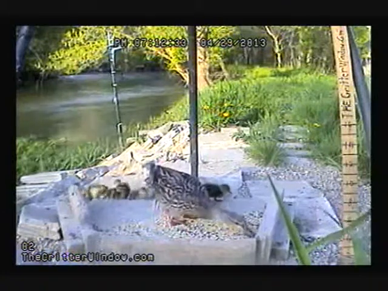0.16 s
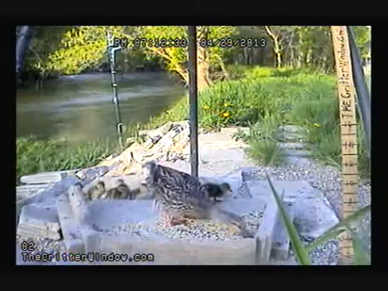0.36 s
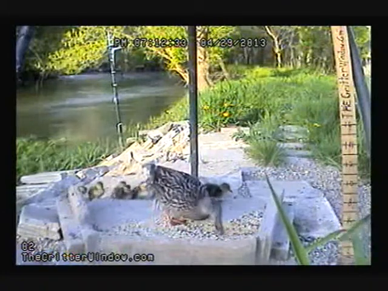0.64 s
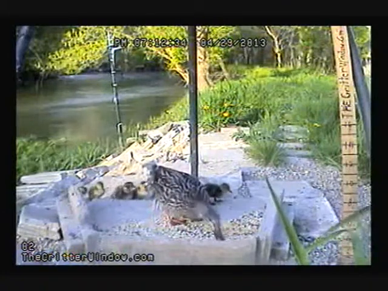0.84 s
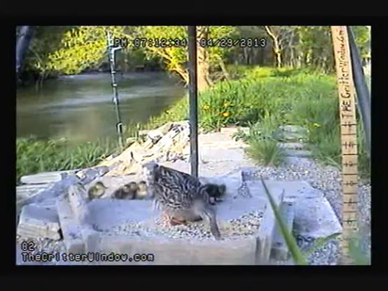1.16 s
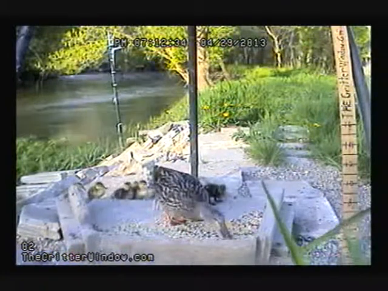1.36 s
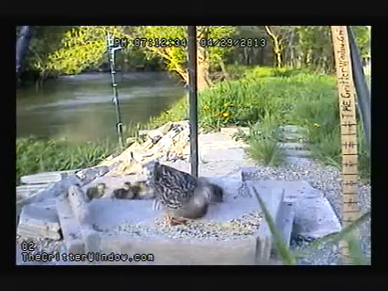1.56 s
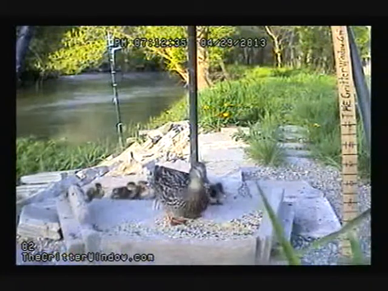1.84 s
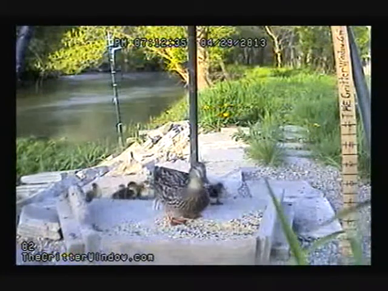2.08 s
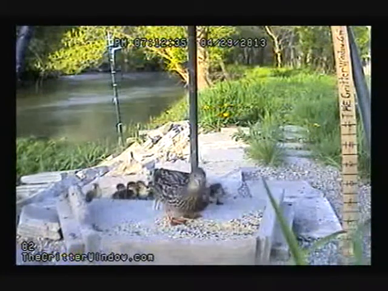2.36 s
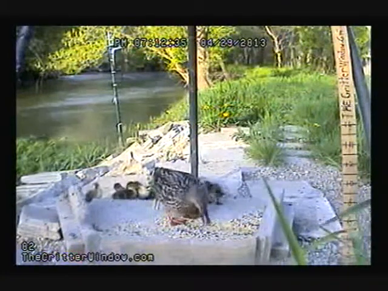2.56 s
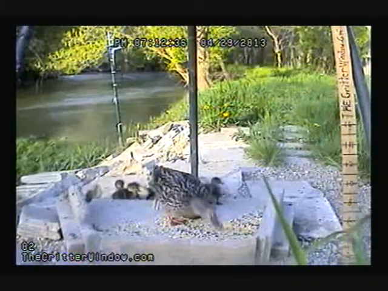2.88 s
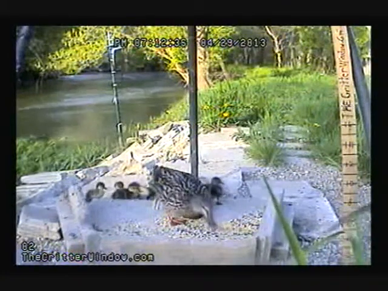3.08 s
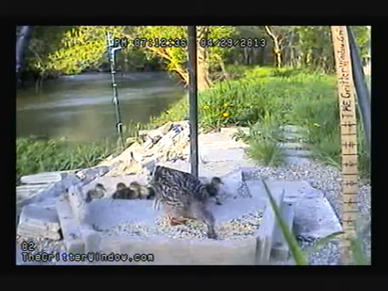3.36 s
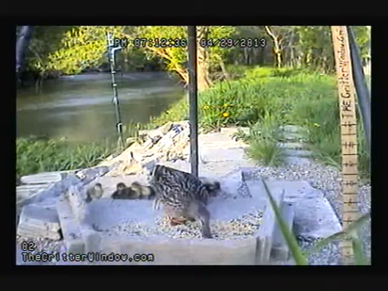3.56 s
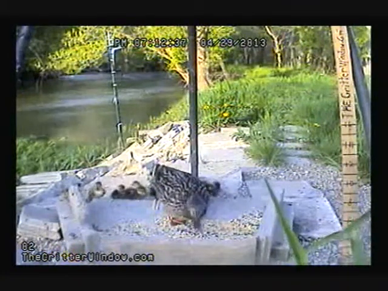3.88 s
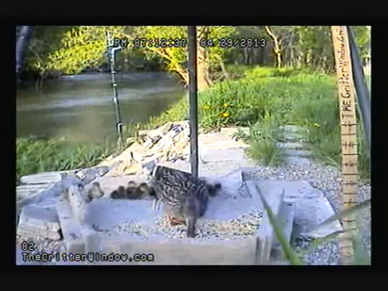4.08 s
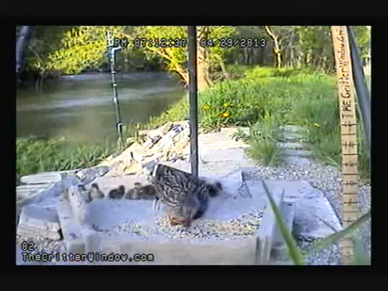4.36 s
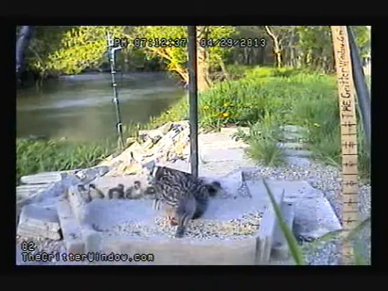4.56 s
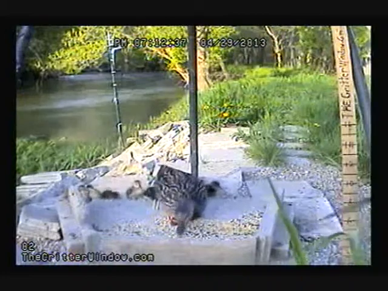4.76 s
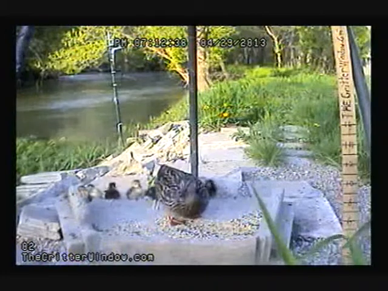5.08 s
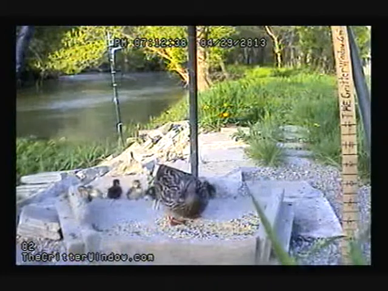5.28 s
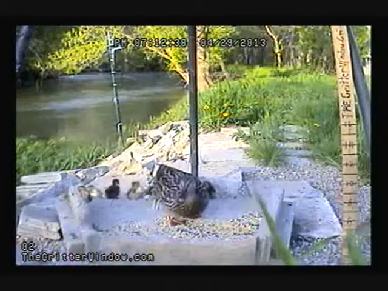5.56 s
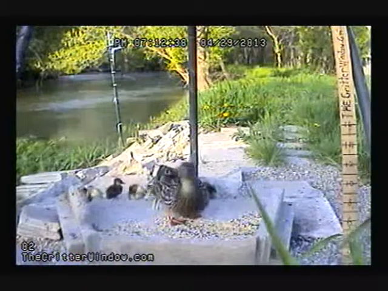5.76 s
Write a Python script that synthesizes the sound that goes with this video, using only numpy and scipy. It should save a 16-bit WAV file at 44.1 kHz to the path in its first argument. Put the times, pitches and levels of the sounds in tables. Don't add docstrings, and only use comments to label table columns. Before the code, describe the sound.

Close outdoor scene on a stony river bank. Ducklings give scattered thin, sliding peeps throughout, while the mother makes breathy two-toned rising whistles and short low clucks, busiest after four seconds. Bills tick, knock and scrape in loose seed. Faint songbirds chip across the water over a steady rush and low traffic hum. Near the end, wind softly thumps the still microphone.

```python
import sys
import numpy as np
from scipy import signal
from scipy.io import wavfile
from scipy.ndimage import uniform_filter1d

SR = 44100
rng = np.random.default_rng(int(sys.argv[2]) if len(sys.argv) > 2 else 0)


def level_to_linear(level):
    exponent = np.asarray(level, float) / 20
    return 10 ** exponent


def persist_wave(psi):
    counts = np.round(np.clip(psi, -1, 1) * 32767).astype(np.int16)
    wavfile.write(sys.argv[1], SR, np.atleast_2d(counts).T)


N = 261513


def track(table):
    s, *columns = np.transpose(table)
    return [np.interp(np.arange(N) / SR, s, c) for c in columns]


def unit(x):
    return x / np.sqrt(np.mean(x ** 2))


def band(x, lo_hz, hi_hz, order=2):
    sos = signal.butter(order, [lo_hz, min(hi_hz, .45 * SR)], "band", fs=SR, output="sos")
    return signal.sosfilt(sos, x)


def add(out, s, sound):
    i = max(int(s * SR), 0)
    out[i:i + len(sound)] += sound[:N - i]


def walk(rate_hz, size=N):
    hold = int(SR / rate_hz)
    steps = np.repeat(rng.standard_normal(size // hold + 1), hold)
    return 1.576 * uniform_filter1d(uniform_filter1d(steps, hold), hold)[:size]


def coloured(spectrum, flicker_db, rate_hz):
    hz, db = np.transpose(spectrum)
    octaves = np.log2(hz[-1] / hz[0])
    out = np.zeros(N)
    for f in hz[0] * 2 ** np.arange(1 / 6, octaves, 1 / 3):
        part = unit(band(rng.standard_normal(N), f / 2 ** (1 / 6), f * 2 ** (1 / 6)))
        level_db = np.interp(np.log(f), np.log(hz), db)
        out += part * np.sqrt(f) * level_to_linear(level_db + flicker_db * walk(rate_hz))
    return unit(out)


def echo(x, t60_s, gap_s):
    t = np.arange(int(.5 * SR)) / SR
    scatter = rng.standard_normal(len(t)) * level_to_linear(-60 * t / t60_s) * (t > gap_s)
    return signal.fftconvolve(x, scatter / np.sqrt(np.sum(scatter ** 2)))[:N]


def note(table, edge_s, smooth_s):
    s, *columns = np.transpose(table)
    t = np.arange(s[0] - edge_s, s[-1] + edge_s, 1 / SR)
    shape = np.clip(np.minimum(t - t[0], t[-1] - t) / (2 * edge_s), 0, 1) ** 2
    curves = [uniform_filter1d(np.interp(t, s, c), int(smooth_s * SR)) for c in columns]
    return t[0], shape, curves


def phase(hz, wobble):
    trembling_hz = hz * (1 + wobble * walk(89.0, size=len(hz)))
    return 2 * np.pi * (rng.random() + np.cumsum(trembling_hz) / SR)


def calls(rows, breath, arch=False, power=1):
    first_db, full, until, last_db = breath
    u = np.linspace(0, 1, num=12)
    way = 4 * u * (1 - u) if arch else u ** power
    corners = np.clip([0, full, max(until, full), 1], 0, 1)
    swell = np.interp(u, corners, (level_to_linear(first_db), 1, 1, level_to_linear(last_db)))
    db = 20 * np.log10(swell)
    return [np.transpose([s + u * length, a + (b - a) * way, level + db]) for s, length, a, b, level in rows]


def pipe(whistled):
    out = np.zeros(N)
    for call in whistled:
        curve = [(s, hz, level_to_linear(db)) for s, hz, db in call]
        s, shape, (hz, gain) = note(curve, edge_s=.003, smooth_s=0.0021)
        p = phase(hz, wobble=0.0073)
        tone = np.sin(p) + level_to_linear(-33.5) * np.sin(2 * p)
        breath = gain * level_to_linear(1.9 * walk(87, size=len(p)))
        add(out, s, np.sqrt(2) * shape * breath * tone)
    return out


def crackle(count=900):
    out = np.zeros(N)
    for when, pitch, size in rng.random((count, 3)):
        hz = 2500 * 3.8 ** pitch
        grain = signal.windows.hann(int(14 * SR / hz))
        ring = np.sin(2 * np.pi * hz * np.arange(len(grain)) / SR)
        add(out, when * N / SR, level_to_linear(-1.6 * np.log(1 - size)) * grain * ring)
    return unit(out)


# time in seconds, rustle level in dB.
BUSTLE = [(0.0, -62.5), (0.54, -63.5), (1.5, -59.5), (2.08, -55.5), (2.97, -62.5), (3.95, -60), (5.17, -59),
          (5.43, -51.5), (5.93, -53)]
# time in seconds, level in dB.
TRAFFIC = [(0.0, -45.5), (.55, -43.5), (1.1, -44.5), (1.7, -46), (2.3, -45.5), (2.85, -43.5), (3.3, -46),
           (3.9, -46.5), (5.0, -45.5), (5.93, -45.5)]
# frequency in Hz, level in dB per Hz.
RUSTLE_TONE = [(880, -38), (1500, -6), (2810, -1), (3880, -2.5), (5840, -11), (9510, -16), (12000, -10.5),
               (15600, -55), (22000, -120)]
# frequency in Hz, level in dB per Hz.
RUSH_TONE = [(120, -63), (200, -2.5), (251, -3), (565, -6.5), (930, 2.5), (1270, 1), (1760, -3),
             (3650, -11), (5350, -27), (6000, -68), (7800, -30), (13200, -120)]
# frequency in Hz, level in dB per Hz.
HUM_TONE = [(12, -56), (20, -13), (32, -9), (82, 4.5), (102, 3), (155, -11), (186, -8.5), (231, -27.5),
            (300, -28.5), (390, -19.5), (660, -120)]


def riverbank():
    bustle_db, = track(BUSTLE)
    traffic_db, = track(TRAFFIC)
    rush = coloured(RUSH_TONE, flicker_db=1.15, rate_hz=14) * level_to_linear(traffic_db)
    rustle = coloured(RUSTLE_TONE, flicker_db=1.6, rate_hz=20) * level_to_linear(bustle_db + 4.5)
    rustle = rustle * level_to_linear(.9 * walk(45))
    snaps = crackle() * level_to_linear(bustle_db - 7.0)
    hum = coloured(HUM_TONE, flicker_db=0.34, rate_hz=4.26) * level_to_linear(-44)
    return rush + rustle + snaps + hum


# start in seconds, length in seconds, first pitch in Hz, last pitch in Hz, level in dB.
SLIDES = [(0.0, .03, 3220, 2480, -48), (.295, .02, 3200, 3400, -50), (.32, .02, 4000, 3750, -46),
          (.362, .02, 3600, 3300, -49), (.555, 0.036, 3950, 2900, -40), (.59, .022, 2850, 2550, -49),
          (.615, 0.033, 3960, 3850, -58), (.945, 0.054, 4090, 2770, -37.5),
          (.995, 0.023, 2850, 2860, -38.5), (1.292, .025, 4030, 3600, -50), (1.595, .016, 2860, 3010, -48),
          (1.603, 0.022, 3850, 3500, -45), (2.19, .02, 3760, 3550, -41), (2.315, 0.037, 2750, 3100, -48),
          (2.478, 0.046, 3900, 2950, -38.5), (2.6, 0.039, 3090, 2600, -47),
          (2.64, 0.017, 2720, 2620, -42.5), (3.803, 0.023, 2630, 2760, -47),
          (4.295, 0.049, 2750, 3420, -49), (5.375, 0.028, 2520, 2100, -49), (5.585, 0.028, 3280, 2800, -42),
          (5.605, 0.03, 3820, 2950, -35)]
# start in seconds, length in seconds, first pitch in Hz, last pitch in Hz, level in dB.
DROOPS = [(.33, 0.053, 3570, 2480, -44), (.665, 0.073, 3550, 2680, -48.5), (1.61, .024, 3020, 2680, -44),
          (1.632, .025, 2600, 2050, -53), (2.525, .035, 3010, 2620, -50), (2.842, 0.052, 3040, 2150, -41),
          (3.75, 0.062, 3040, 2510, -40.5), (4.012, 0.043, 3200, 2510, -40.5),
          (4.348, 0.038, 3410, 2410, -45), (5.328, 0.045, 3290, 2520, -36.5),
          (5.625, 0.026, 3280, 2190, -39), (5.65, .07, 3330, 2580, -46)]
# start in seconds, length in seconds, foot pitch in Hz, top pitch in Hz, level in dB.
ARCHES = [(1.375, .03, 2710, 2860, -46), (4.565, 0.083, 2760, 3680, -44.5), (4.66, 0.04, 2410, 2700, -43.5),
          (5.14, 0.058, 2700, 2870, -46.5)]
# time in seconds, pitch in Hz, level in dB.
WARBLE = [(2.12, 3100, -66), (2.155, 3420, -49), (2.18, 3540, -37), (2.2, 3170, -35.5),
          (2.222, 3160, -42.5), (2.24, 2570, -62)]


def duckling_peeps():
    slides = calls(SLIDES, breath=(-10, 0.7, 0.8, -1))
    droops = calls(DROOPS, breath=(-4, 0.8, -0.7, -10), power=2)
    arches = calls(ARCHES, breath=(-5, 2, .9, 0), arch=True)
    return pipe(slides + droops + arches + [WARBLE])


# time in seconds, peak in dB, ring in Hz, crack against the ring in dB.
TICKS = [(0.0248, -36.5, 3800, -6), (0.0833, -48, 3160, 5), (0.3175, -34, 3470, -6),
         (0.4196, -40, 4160, -4), (0.804, -42, 3000, -10), (0.845, -44, 2980, -1),
         (1.4344, -37.5, 3330, -3), (1.5034, -40.5, 3580, 3), (1.6584, -37.5, 2970, 0.5),
         (1.8473, -39, 4420, -4), (1.923, -36.5, 3800, 1), (1.998, -32, 4150, -3), (2.4962, -25, 3950, -5),
         (2.797, -35, 3570, -6), (3.199, -28, 3800, -3.5), (3.393, -36.5, 3660, -26),
         (3.487, -38, 3870, -14), (3.699, -42, 2750, 4), (3.905, -45, 2650, -1), (4.03, -24.5, 3980, -1.5),
         (4.5411, -34, 2940, -10), (4.6553, -35, 2790, -3), (5.3865, -35.5, 3540, -3),
         (5.5723, -34.5, 4070, 2.5), (5.6823, -32.5, 3110, -4), (5.7307, -22.5, 3500, -3),
         (5.749, -35, 2680, -3), (5.7806, -30, 6840, -2), (5.864, -36, 3960, -4), (5.8874, -46, 2900, -6)]
# time in seconds, peak in dB, ring in Hz, crack
# against the ring in dB.
TAPS = [
    (0.2156, -28, 1080, -18),
    (1.144, -36, 2000, -6),
    (1.7934, -30, 2170, -7.5),
    (1.9001, -22, 1980, -17),
    (3.6767, -37.5, 2550, -3.5),
    (5.5234, -29, 1840, -1),
]


def seed_ticks():
    out = np.zeros(N)
    t = np.arange(int(.04 * SR)) / SR - .01
    knocks = TICKS + TAPS
    for (s, db, hz, crack_db), noise in zip(knocks, rng.standard_normal((len(knocks), len(t)))):
        fade = level_to_linear(-60 * np.abs(t) / 0.009)
        ring = np.sin(2 * np.pi * hz * t) * fade * np.clip(t / 0.0002, 0, 1)
        husk = level_to_linear(-4.5) * np.exp(-np.abs(t - .002) / np.where(t < .002, .0025, .005))
        snap = np.exp(-np.abs(t) / 0.00031)
        crack = band(noise * (snap + husk), 1900, 5600)
        add(out, s + t[0], level_to_linear(db) * (ring + level_to_linear(crack_db) * crack / np.abs(crack).max()))
    return out


# time in seconds, peak in dB, pulse rate in Hz, fade in seconds, sharpness in Hz.
CLUCKS = [(0.2156, -28.5, 292, 0.0084, 1120), (.9185, -37, 300, .004, 900), (1.098, -33, 365, 0.0035, 800),
          (1.9005, -32, 277, 0.0058, 890), (3.207, -41.5, 432, 0.033, 810),
          (3.5282, -35.5, 415, 0.0086, 800), (4.1059, -24, 283.5, 0.015, 1310),
          (4.203, -43, 330, .002, 595), (4.2059, -25, 340, 0.0011, 590), (4.28, -40, 333, 0.005, 600),
          (4.5073, -21, 344, 0.0056, 1240), (4.659, -30.5, 342, 0.0051, 900),
          (4.6807, -32, 332, 0.0017, 594), (4.6981, -32.5, 334, 0.0074, 596),
          (4.7794, -29.5, 327, 0.0018, 900), (4.8226, -30, 453, 0.0024, 604),
          (4.837, -30, 430, 0.0081, 585), (5.1705, -29, 277, 0.011, 1200), (5.649, -29, 243, 0.0047, 900)]


def clucks():
    out = np.zeros(N)
    for (s, db, rate_hz, fade_s, edge_hz), chance in zip(CLUCKS, rng.standard_normal((len(CLUCKS), 16))):
        gaps = (1 + .04 * chance) * .95 ** np.arange(16) / rate_hz
        times = np.cumsum(gaps) - gaps[0]
        pulses = np.zeros(int(.09 * SR))
        pulses[np.clip((times * SR).astype(int), 0, len(pulses) - 1)] = np.exp(-times / fade_s)
        puffs = np.convolve(pulses, signal.windows.hann(int(SR / edge_hz)))
        throat = level_to_linear(0.5) * band(puffs, 300, 530, order=1)
        sound = band(puffs, 140, 4000, order=1) + throat
        add(out, s, level_to_linear(db) * sound / np.abs(sound).max())
    return out


# time in seconds, pitch in Hz, level in dB.
WHISTLES = [
    [(.245, 1856, -40), (.275, 1956, -36.5), (.29, 2070, -51), (.31, 2110, -40.5), (.4, 2160, -45),
     (.435, 2147, -38), (.465, 2140, -48)],
    [(.49, 1894, -46), (.497, 1876, -35), (.503, 1905, -45), (.509, 2094, -36), (.522, 2110, -35.5)],
    [(1.113, 1800, -47), (1.176, 2053, -45), (1.226, 2132, -38.5), (1.256, 2100, -46), (1.286, 2150, -37.5),
     (1.316, 2060, -45)],
    [(1.94, 1962, -38.5), (2.0, 2044, -43), (2.07, 2140, -32), (2.1, 2090, -38), (2.125, 2050, -41),
     (2.152, 2127, -32)],
    [(3.205, 1155, -67), (3.26, 1754, -47), (3.31, 1963, -45.5), (3.355, 2050, -44.5)],
    [(4.125, 1794, -67), (4.195, 1960, -41), (4.22, 2083, -36.5), (4.27, 2100, -36), (4.3, 2234, -33.5),
     (4.34, 2153, -38), (4.37, 2150, -34), (4.41, 2090, -38), (4.432, 2143, -35)],
    [(4.52, 2167, -53), (4.543, 2146, -46.5)],
    [(4.665, 1920, -43), (4.69, 2070, -52), (4.75, 2100, -37.5), (4.825, 2102, -43)],
    [(5.185, 1815, -50), (5.224, 1973, -37), (5.25, 2044, -32.5), (5.298, 2080, -35.5), (5.33, 2110, -31),
     (5.345, 2070, -35.5)],
]
# first pitch in Hz, top pitch in Hz, creep in seconds, first level in dB, last level in dB.
LOW_VOICE = [(860, 1190, 0.077, -41, -49), (866, 1160, .02, -31, -41.5), (873, 1260, 0.081, -42.5, -48),
             (900, 1160, 0.0318, -48.5, -47.5), (540, 1010, 0.065, -50, -43), (714, 1290, 0.085, -48, -48),
             (1193, 1300, 0.045, -62, -62), (950, 1290, .08, -66, -51), (940, 1210, 0.073, -56, -52.5)]
CLOSE_SHARE = [.6, 1, 1, 1, 0.053, 1, .3, .8, .6]
# high octave in dB, low octave in dB, sum tone in dB.
OVERTONES = [(-28, -17, -13), (-16, -12, -16), (-28, -14, -20), (-30, -12, -17), (-10, -12, -24),
             (-24, -14, -28), (-24, -14, -22), (-30, -14, -26), (-30, -7, -24)]


def voices(high, low, shut):
    close_s, close_db = 0.025, -6
    first_hz, top_hz, creep_s, first_db, last_db = low
    end_s, end_hz, end_db = high[-1]
    s, hz, db = np.transpose(high + [(end_s + close_s, end_hz, end_db + close_db)])
    t = np.arange(s[0], s[-1], .003)
    closing = shut * np.clip((t - end_s) / close_s, 0, 1) ** 2
    start, top = first_hz / hz[0], top_hz / hz.max()
    interval = top + (start - top) * np.exp((s[0] - t) / creep_s)
    interval = interval * (1 - 0.15 * closing)
    low_db = np.interp(t, [s[0], end_s], [first_db, last_db]) + 3 * closing
    high_hz = np.interp(np.minimum(t, end_s), s, hz) * (1 - 0.133 * closing)
    high_gain = np.interp(t, s, level_to_linear(db))
    return np.transpose([t, high_hz, high_gain, high_hz * interval, level_to_linear(low_db)])


def whistles():
    out = np.zeros(N)
    for call, under, shut, (high2_db, low2_db, sum_db) in zip(WHISTLES, LOW_VOICE, CLOSE_SHARE, OVERTONES):
        curves = voices(call, under, shut)
        s, shape, (high_hz, high_gain, low_hz, low_gain) = note(curves, edge_s=.007, smooth_s=.005)
        a, b = phase(high_hz, wobble=.007), phase(low_hz, wobble=.011)
        flutter = [level_to_linear(db * walk(95, size=len(a))) for db in (1.5, 2.4, 4, 4, 3)]
        high = high_gain * (flutter[0] * np.sin(a) + level_to_linear(high2_db) * flutter[2] * np.sin(2 * a))
        low = low_gain * (flutter[1] * np.sin(b) + level_to_linear(low2_db) * flutter[3] * np.sin(2 * b))
        both = np.sqrt(high_gain * low_gain) * level_to_linear(sum_db) * flutter[4] * np.sin(a + b)
        add(out, s, np.sqrt(2) * shape * (high + low + both))
    return out


# time in seconds, peak in dB.
HUSKS = [(0.2797, -50), (0.3714, -50), (0.5111, -49), (0.5386, -51), (0.9905, -49), (1.2205, -44),
         (1.3702, -48), (1.7199, -46), (2.2482, -44), (2.6727, -48), (2.7346, -49), (3.036, -48),
         (3.1092, -44), (3.7333, -44), (3.7637, -46), (3.9673, -50), (4.1688, -43), (4.2207, -45),
         (4.7535, -43), (4.795, -48), (4.8159, -51), (4.8877, -49), (5.0319, -52), (5.1012, -47),
         (5.2394, -37.5), (5.2658, -42), (5.3394, -39), (5.4844, -39), (5.5994, -39), (5.6355, -35),
         (5.8274, -41)]


def husks():
    out = np.zeros(N)
    t = np.arange(int(.03 * SR)) / SR
    shape = np.exp(-t / 0.0042) * np.clip(t / .0008, 0, 1)
    for (s, db), noise in zip(HUSKS, rng.standard_normal((len(HUSKS), len(t)))):
        snap = band(noise, 2600, 8900, order=1) * shape
        add(out, s, level_to_linear(db - 1) * snap / np.abs(snap).max())
    return out


# start in seconds, length in seconds, first pitch in
# Hz, last pitch in Hz, level in dB.
HELD = [(.42, 0.038, 4250, 4330, -50), (2.445, 0.037, 4380, 4400, -51), (2.52, .07, 3830, 3800, -51),
        (2.75, 0.06, 4350, 4340, -54), (2.84, .08, 4360, 4380, -61.5), (3.06, .12, 4320, 4250, -57),
        (4.22, .1, 3920, 3900, -49), (4.395, .038, 4200, 4280, -46)]
# start in seconds, length in seconds, first pitch in Hz, last pitch in Hz, level in dB.
CHIPS = [(1.895, 0.023, 4000, 3450, -43), (2.492, 0.018, 3820, 3780, -34.5), (2.61, 0.038, 3850, 3890, -49),
         (2.722, 0.022, 4050, 4360, -50), (2.76, 0.027, 4050, 3520, -43.5), (3.01, 0.013, 3890, 4200, -52),
         (3.04, 0.026, 4250, 3550, -44.5), (3.064, .012, 3500, 3480, -40), (4.017, 0.018, 3800, 4110, -36),
         (4.09, 0.014, 3920, 4020, -48), (4.145, 0.012, 3080, 3220, -42), (4.154, 0.018, 3796, 3935, -34)]


def songbirds():
    chips = pipe(calls(CHIPS, breath=(-5, 1.2, .9, -2)))
    held = pipe(calls(HELD, breath=(-4, 2.3, -2, -8)))
    leaves = level_to_linear(3.5 * walk(40))
    wood = level_to_linear(-10) * echo(chips, t60_s=0.9, gap_s=0.013)
    return chips + leaves * held + leaves * wood


def grit(size, spread_db):
    return unit(rng.standard_normal(size) * level_to_linear(spread_db * rng.exponential(size=size)))


# start in seconds, length in seconds, level in dB, centre in Hz.
SCRAPES = [(1.92, 0.057, -51, 4000), (2.35, 0.085, -30, 3150), (2.359, 0.07, -50, 5470),
           (2.488, 0.035, -38.5, 2880), (3.27, .1, -60, 7500), (4.738, 0.052, -51.5, 5530),
           (5.21, 0.18, -52.5, 6660), (5.471, 0.033, -44, 2900), (5.563, 0.041, -44, 6100),
           (5.74, 0.038, -41.5, 5230), (5.877, 0.047, -49.5, 7050)]


def scrapes():
    out = np.zeros(N)
    for s, length, db, hz in SCRAPES:
        grains = grit(int(length * SR), spread_db=1.5)
        body = unit(band(grains, hz * 0.57, hz * 1.5, order=3))
        skirt = level_to_linear(-7.5) * unit(band(grains, hz * 1.264, hz * 1.71))
        swell = np.sin(np.linspace(0, np.pi, len(grains))) ** .95
        swell = swell * level_to_linear(1.1 * walk(150, size=len(grains)))
        add(out, s, level_to_linear(db) * swell * (body + skirt))
    return out


# centre in seconds, half width in seconds, level in dB.
GUST = [
    (5.45, 0.017, -39),
    (5.535, 0.064, -31.5),
    (5.74, 0.042, -42.5),
    (5.85, 0.038, -44),
]


def gust():
    t = np.arange(N) / SR
    air = band(rng.standard_normal(N), 35, 145)
    steady = air / np.sqrt(uniform_filter1d(air ** 2, int(.05 * SR)) + 1e-12)
    push = sum(level_to_linear(db) * np.exp(-.5 * ((t - s) / half) ** 2) for s, half, db in GUST)
    return push * steady


def scene():
    near = duckling_peeps() + seed_ticks() + clucks() + whistles() + husks() + scrapes()
    stones = level_to_linear(-21) * echo(near, t60_s=.15, gap_s=0.0023)
    return (near + stones + songbirds() + riverbank() + gust())[None]


def roll_off(x):
    return signal.sosfilt(signal.butter(12, 12180, fs=SR, output="sos"), x)


def record(dry):
    top_filter = signal.ellip(8, .2, 60, 12050, fs=SR, output="sos")
    mix = signal.sosfilt(top_filter, dry)
    return roll_off(mix)


dry = scene()
out = record(dry)
persist_wave(out)
```